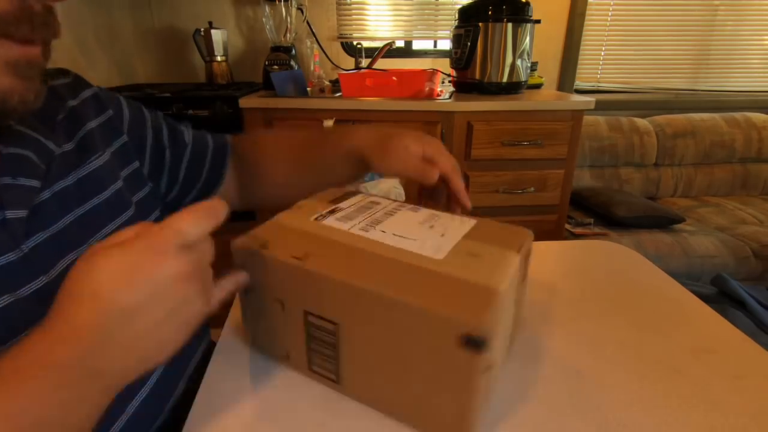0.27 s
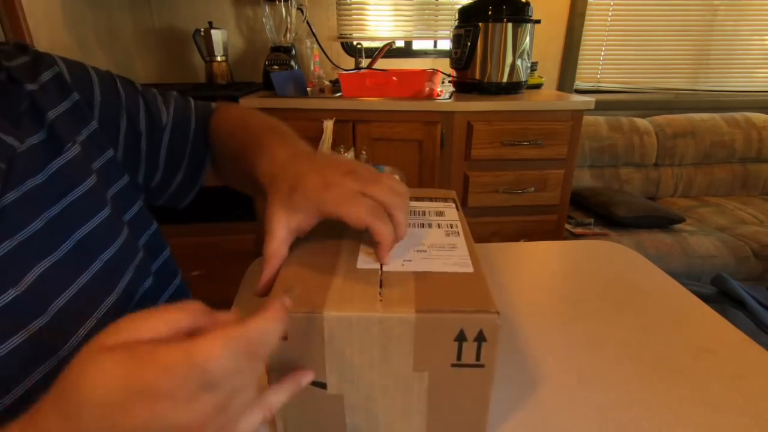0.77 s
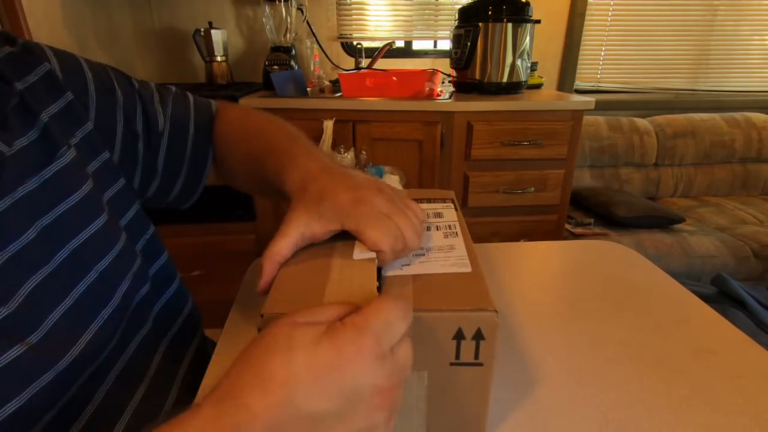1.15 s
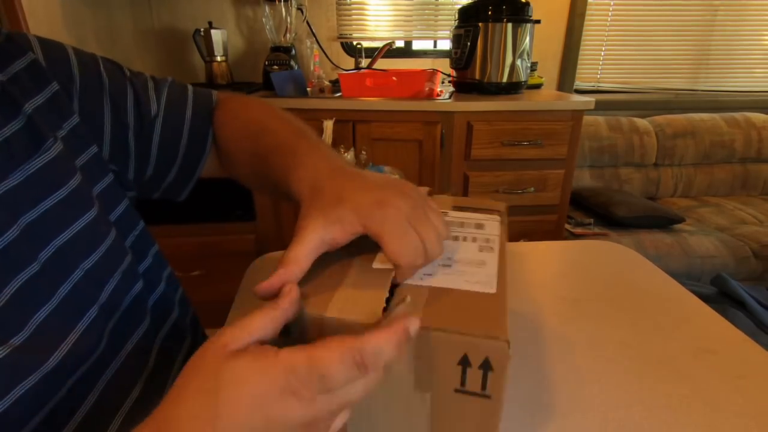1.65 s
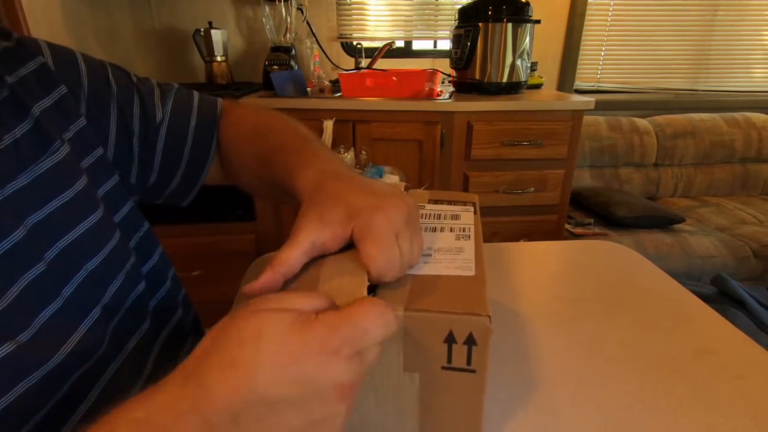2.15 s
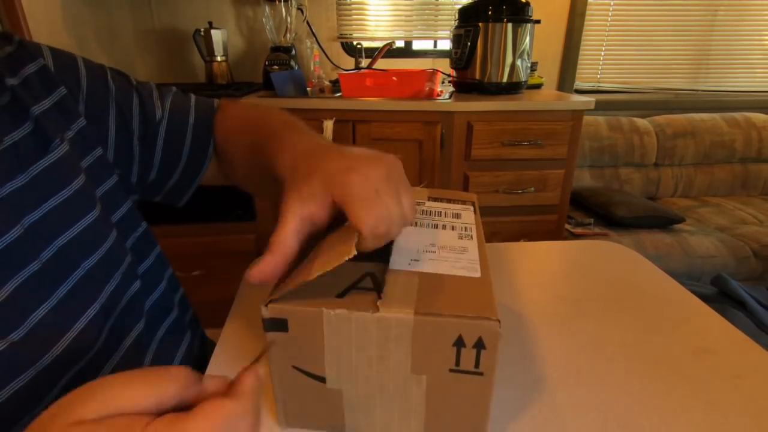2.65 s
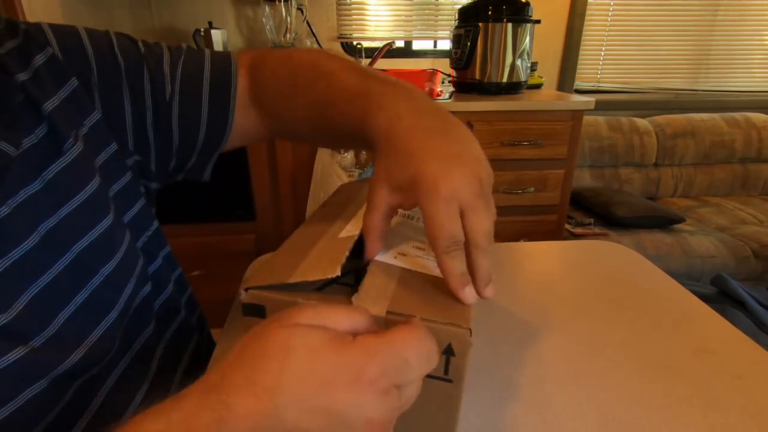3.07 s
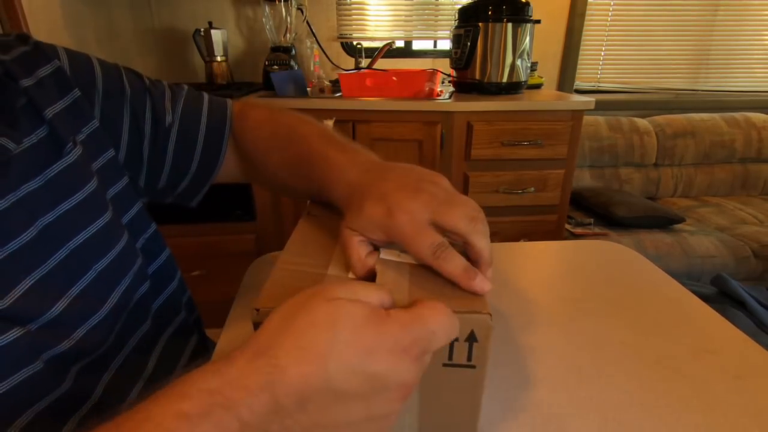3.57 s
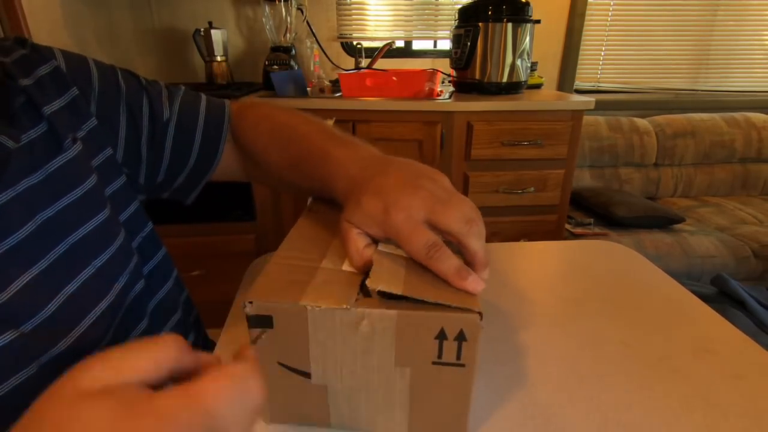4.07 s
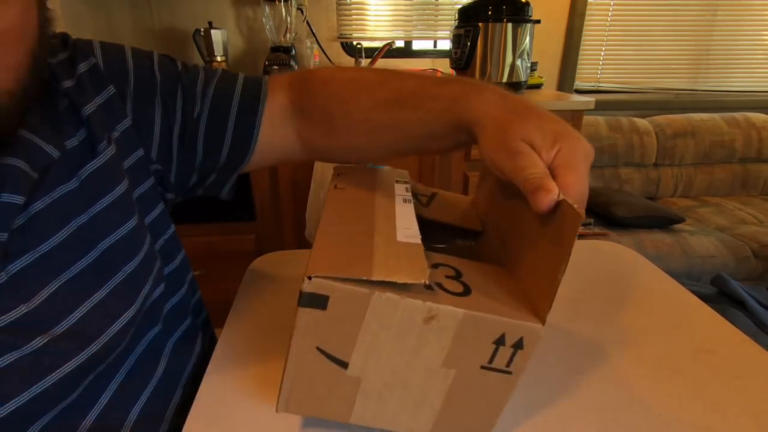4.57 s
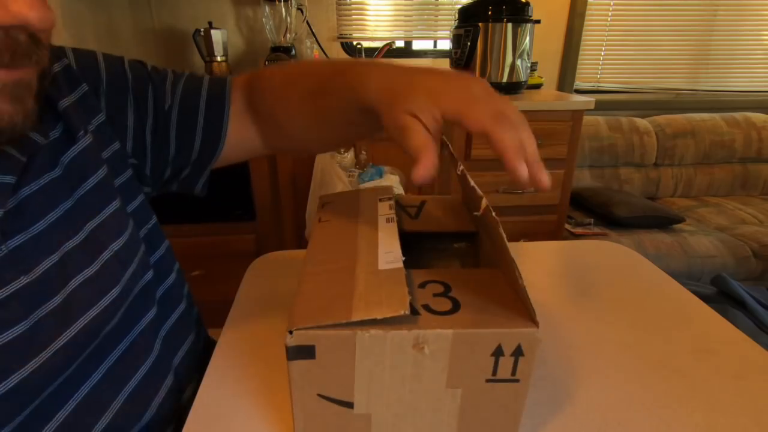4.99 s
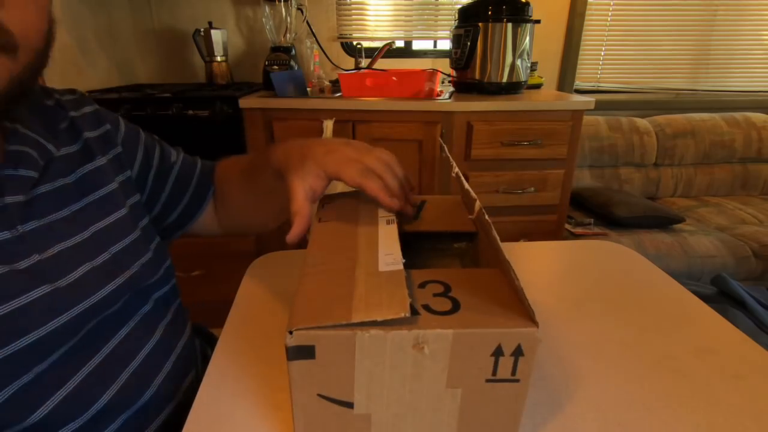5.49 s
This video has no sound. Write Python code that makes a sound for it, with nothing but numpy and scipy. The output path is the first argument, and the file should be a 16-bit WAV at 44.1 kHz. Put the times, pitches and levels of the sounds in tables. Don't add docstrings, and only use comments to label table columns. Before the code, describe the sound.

A close, dry take of hands opening a taped cardboard box on a table in a small quiet room. The first half second holds faint taps, nail scratches and soft skin rubbing. Around 0.9 s a ripping tug sets off a quick cluster of hollow knocks and a low table shudder. Quieter rubbing follows, then a strong hollow thump with a short rip at 1.7 s. After light scuffs, tape tears loudly at about 2.5 s with bright snaps, knocks again at 2.7 s, and cracks hardest near 3.2 s, the box ringing low and boxy. From 3.4 s it calms: papery sliding, a small rip at 3.9 s, a brushing swish at 4.1 s, a dull flap bump with longer scuffing at 4.6 s, faint scratches, and brighter hand rubbing from 5.4 s to the end. Faint room air lies beneath.

```python
import sys
import numpy as np
from scipy import signal
from scipy.fft import rfft, irfft, next_fast_len
from scipy.io import wavfile
from scipy.ndimage import uniform_filter1d, map_coordinates

SR = 44100
rng = np.random.default_rng(int(sys.argv[2]) if len(sys.argv) > 2 else 0)


def volts(x):
    e = np.asarray(x, float) / 20
    return 10 ** e


def wav_out(sig):
    wavfile.write(sys.argv[1], SR, np.round(np.clip(np.atleast_2d(sig).T, -1, 1) * 32767).astype(np.int16))


N = 253134


def unit(x):
    return x / np.sqrt(np.mean(x ** 2) + 1e-20)


def along(points, hz):
    f, v = np.transpose(points)
    return np.interp(np.log(hz + 1), np.log(f + 1), v)


def wobble(rate):
    knots = rng.standard_normal(int(N * rate / SR) + 4)
    return map_coordinates(knots, [np.arange(N) * rate / SR])


def filtered(x, response):
    m = next_fast_len(N + SR // 2)
    return irfft(rfft(x, m) * response(np.fft.rfftfreq(m, 1 / SR)), m)[:N]


def coloured(x, spectrum):
    closed = [(spectrum[0][0] / 2, -120)] + list(spectrum) + [(SR / 2, -120)]
    return unit(filtered(x, lambda hz: volts(along(closed, hz))))


def add(track, s, piece):
    part = track[max(round(s * SR), 0):][:len(piece)]
    part += piece[:len(part)]


def held(rows, rise, fall):
    t = np.arange(0, N, 32) / SR
    start, length, db = (column[:, None] for column in np.transpose(rows))
    too_early = np.maximum(start - t, 0)
    too_late = np.maximum(t - start - length, 0)
    gain = volts(db - rise * too_early - fall * too_late)
    return np.interp(np.arange(N) / SR, t, np.sqrt((gain ** 2).sum(0)))


def slips(rate, spread_db, smooth):
    size = volts(spread_db * np.minimum(rng.exponential(size=N), 2)) * rng.standard_normal(N)
    releases = unit(size * (rng.random(N) < rate / SR))
    return unit(releases + smooth * rng.standard_normal(N))


def patchy(x, patchy_db):
    z = signal.stft(x, nperseg=256)[2]
    field = uniform_filter1d(rng.standard_normal(z.shape), 4, 0)
    field = uniform_filter1d(field, 8, 1)
    return unit(signal.istft(z * volts(patchy_db * unit(field)), nperseg=256)[1][:N])


def box(hz):
    # pitch in Hz, width in Hz, level in dB.
    box_modes = [(154.6, 31.3, -1.5), (240, 46, 2.5), (420, 98.5, -1), (597, 280, -10), (799, 79, -6),
                 (887, 43, -4.5), (1140, 140, -14), (1700, 270, -27)]
    ringing = 0
    for k, (centre, width, db) in enumerate(box_modes):
        mode = 1j * hz * width / (centre * centre - hz * hz + 1j * hz * width)
        ringing = ringing + (-1) ** k * volts(db) * mode
    return ringing / (1 + 1j * hz / 6500) ** 4


def tape_rips():
    # time in seconds, peak in dB, time to fade by 60 dB in seconds,
    # pull on the box in dB relative to the peak.
    rips = [(0.0227, -31, 0.12, 16), (0.569, -43, 0.046, -19), (0.5905, -24, 0.13, -11),
            (0.82, -29.5, 0.091, 12.5), (0.8758, -13.5, 0.2, 7.5), (0.9226, -30, 0.074, 0),
            (1.01, -30, 0.25, 16), (1.372, -39, 0.31, -6), (1.6756, -20, 0.17, -10),
            (1.922, -27, 0.059, -4), (2.4115, -23.5, 0.074, 12), (2.487, -12.5, 0.22, 0),
            (2.552, -7, 0.11, 8), (2.7222, -20, 0.059, -13), (3.1534, -8, 0.16, 8),
            (3.1938, -14.5, 0.067, -7), (3.257, -21.5, 0.13, -8), (3.8706, -24, 0.17, 5)]
    # frequency in Hz, level in dB.
    tear = [(530, -7), (900, -7.5), (1370, -6.5), (2030, -7.5), (2610, -7), (3560, -11.5), (4470, -9.5),
            (6400, -13), (11400, -47.5), (13300, -43), (15700, -63)]
    rise_s, creep_db, creep_s = .003, -21, .014
    crack, crack_s = .6, .004
    rip, tug, t = np.zeros(N), np.zeros(N), np.arange(SR // 3) / SR
    for s, db, t60, pull_db in rips:
        shape = volts(db - 7 - 60 * t / t60) * (1 - np.exp(-t / rise_s))
        creep = volts(db + creep_db) * np.exp((t - .05) / creep_s) * (t < .05)
        add(rip, s - .05, creep)
        add(rip, s - .002, shape * (1 + crack * np.exp(-t / crack_s)))
        add(tug, s - .002, volts(pull_db) * shape)
    glue = patchy(slips(rate=1500, spread_db=3, smooth=0.74), patchy_db=2.5)
    pulling = tug * slips(rate=800, spread_db=3.0, smooth=0.82)
    return echoes(rip * coloured(glue, tear)) + volts(14.5) * filtered(pulling, box)


def glue_snaps():
    # time in seconds, peak in dB, pitch in Hz.
    snaps = [(0.436, -39, 875), (0.821, -32, 1500), (0.592, -26, 4400), (1.159, -27, 864),
             (2.095, -50, 1090), (2.413, -27, 4800), (2.49, -9, 4020), (2.49, -15, 2600),
             (2.503, -20, 4020), (2.553, -4, 4070), (2.726, -7, 620), (2.979, -32, 5870),
             (3.046, -28.5, 890), (3.159, 0, 880), (3.193, -8, 4550), (3.262, -21, 1300),
             (3.275, -23.5, 1000), (3.763, -33, 880), (3.838, -33, 1500), (3.875, -19, 2260),
             (4.96, -33, 700), (5.186, -39, 1700), (5.209, -39.5, 3200), (5.46, -36, 4360)]
    threads, t = np.zeros(N), np.arange(SR // 3) / SR
    for s, db, hz in snaps:
        shape = volts(db + 2 - 60 * t / 0.01) * (1 - np.exp(-t / 0.00035))
        add(threads, s, shape * np.sin(2 * np.pi * hz * t))
    return filtered(threads, lambda hz: 1 / (1 + (hz / 7500) ** 8))


def knocks():
    # time in seconds, peak in dB, panel pitch in Hz, hardness in dB.
    flaps = [(0.027, -29, 782, -3.5), (0.746, -35, 250, 4.5), (0.868, -10.5, 240, -9),
             (0.885, -11.5, 408, 1.5), (0.904, -12, 264, -10), (0.925, -14, 250, -19),
             (0.96, -12.5, 290, 5), (1.011, -22.5, 463, 1), (1.154, -35, 434, 11), (1.37, -23, 237, -8),
             (1.682, -2, 213, -2.5), (1.704, -16.5, 420, -13), (1.924, -25.5, 286, 2),
             (2.095, -33.5, 251, 3.5), (2.411, -22.5, 245, 4), (2.552, -6, 431, -12),
             (2.574, -13.5, 249, 0), (2.7244, -3.5, 300, -3), (2.978, -29.5, 223, -4),
             (3.158, -9.5, 234, 6), (3.185, -5.5, 247, -1.5), (3.467, -28, 400, -3), (3.868, -36, 420, 5),
             (4.63, -14.5, 267, -15)]
    # time in seconds, peak in dB, panel pitch in Hz.
    more_knocks = [(0.12, -28.5, 153), (0.16, -24.5, 245), (0.431, -34.5, 254), (0.485, -29.5, 253),
                   (0.589, -24.5, 370), (0.818, -20.5, 150), (1.398, -26, 154), (1.446, -20, 240),
                   (2.272, -25.5, 369), (2.844, -30.5, 174), (3.045, -33, 152), (3.257, -22.5, 460),
                   (3.312, -28.5, 252), (3.76, -34, 272), (4.959, -40, 282), (5.307, -39.5, 331)]
    shared_hard_db = -6.5
    ring_s, ring_s_per_db = .036, -.0006
    panel, push, t = np.zeros(N), np.zeros(N), np.arange(SR // 5) / SR
    for s, db, hz, hard_db in list(flaps) + [(*row, shared_hard_db) for row in more_knocks]:
        t60 = ring_s + ring_s_per_db * db
        bend = np.sin(2 * np.pi * hz * t) * volts(-60 * t / t60) * (1 - np.exp(-t / 0.0014))
        clatter = volts(hard_db - 60 * t / 0.035) * rng.standard_normal(len(t))
        thump = np.exp(-(t * hz * 4 - 1.5) ** 2)
        add(panel, s, volts(db + 1.5) * bend)
        add(push, s, volts(db + 17.0) * clatter + volts(db + 3.0) * thump)
    return panel + filtered(push, box)


def rubbing():
    # start in seconds, length in seconds, hiss level in dB,
    # palm level in dB relative to the hiss.
    strokes = [(0.132, 0.22, -61.5, 9), (0.483, 0.089, -57, 0), (0.736, 0.19, -51, 1),
               (0.881, 0.14, -46, -10), (1.002, .2, -54, 2), (1.217, 0.37, -58, 2.5),
               (1.716, .23, -52.5, 0), (2.025, 0.08, -61.5, 4.5), (2.183, 0.15, -59, 5),
               (2.457, .12, -50.5, 3.5), (2.573, 0.088, -40.5, -9), (2.733, 0.028, -52.5, 0),
               (2.814, 0.035, -49.5, -5), (2.896, 0.031, -51.5, -4.5), (2.982, 0.03, -51.5, -1),
               (3.059, 0.034, -52, 1), (3.198, 0.13, -45, -7.5), (3.393, 0.3, -48, -3.5),
               (3.729, 0.22, -56, 1.5), (4.123, 0.16, -42.5, -5.5), (4.367, 0.084, -55.5, -12),
               (4.522, 0.092, -58.5, -4.5), (4.652, .39, -41, -6), (4.8, .14, -40, -3), (5.19, 0.2, -69, 3),
               (5.422, 0.26, -46, -4.5), (5.54, .06, -34, -13), (5.62, .15, -38, -9)]
    # frequency in Hz, level in dB.
    hiss_tone = [(1800, -48.5), (2600, -27), (3300, -11), (4300, -0.5), (5800, 2.5), (7000, -5.5),
                 (9000, -24.5), (10500, -64)]
    palm_tone = [(700, -9.5), (1000, -23.5), (1600, -7.5), (1900, -6.5), (2400, -7.5), (3000, -9.5),
                 (4000, -14.5)]
    edge_tone = [(8500, -10), (10000, -1.5), (11500, -9.5), (13300, -3.5), (15000, -11.5), (15800, -28)]
    rise, fall = 420, 320
    hiss = held([(s, n, db) for s, n, db, _ in strokes], rise, fall)
    palm = held([(s, n, db + rel) for s, n, db, rel in strokes], rise, fall)
    edge = volts(-16) * hiss ** 1.277
    fibres = patchy(slips(rate=4800, spread_db=2.5, smooth=1.3), patchy_db=2.0)
    fibres = fibres * volts(.8 * wobble(30))
    rub = hiss * coloured(fibres, hiss_tone)
    rub += edge * coloured(fibres, edge_tone)
    return rub + palm * coloured(fibres, palm_tone)


def nails():
    # start in seconds, level in dB, length in seconds, brightest pitch in Hz.
    scratches = [(0.096, -44.5, 0.28, 5530), (.74, -50, 0.035, 4970), (2.022, -54.5, 0.046, 5360),
                 (2.182, -60, 0.061, 4600), (2.274, -56, 0.081, 5500), (2.738, -48, 0.042, 5970),
                 (2.813, -46.5, 0.049, 5800), (2.893, -50.5, 0.054, 5700), (2.982, -46, 0.038, 5800),
                 (3.05, -52, 0.059, 4540), (4.348, -51.5, 0.11, 5030), (4.377, -62.5, 0.1, 2500),
                 (4.521, -53.5, 0.045, 3360), (5.10, -56.5, 0.018, 5500), (5.247, -56, 0.11, 2830),
                 (5.296, -53, 0.045, 5600)]
    out = np.zeros(N)
    for s, db, length, hz in scratches:
        count = round(length * SR)
        band = signal.butter(2, [hz * 0.83, hz * 1.11], "bandpass", fs=SR, output="sos")
        scratch = unit(signal.sosfilt(band, rng.standard_normal(SR // 3))[:count])
        add(out, s, volts(db) * np.hanning(count) ** 0.59 * scratch)
    return out


def grip_changes():
    # start in seconds, length in seconds, rumble level in dB,
    # drag on the small panels in dB relative to the rumble.
    grips = [(0.01, 0.16, -39, -14.5), (0.247, 0.12, -44, -10.5), (0.438, 0.13, -46.5, -20),
             (0.574, 0.028, -46, 4), (0.668, .16, -50, -10), (0.87, 0.11, -36, -14), (0.983, 0.18, -42, 2),
             (1.23, 0.076, -47, -9), (1.362, 0.11, -40, -18), (1.503, 0.15, -53.5, -11),
             (1.681, 0.053, -29.5, -12), (1.765, .2, -40, -15), (2.02, 0.15, -49.5, -18),
             (2.177, 0.11, -44.5, -0.5), (2.406, 0.028, -38, -2.5), (2.503, 0.086, -40, -15),
             (2.633, .5, -52.5, -3), (3.157, 0.17, -43, -4.5), (3.448, .06, -38.5, -10),
             (3.546, 0.17, -49, -15), (3.77, .14, -40.5, -11), (3.95, 0.18, -59, -11),
             (4.167, 0.13, -45, -15.5), (4.338, 0.23, -60.5, -12), (4.63, 0.39, -49, -4.5),
             (4.909, 0.14, -45.5, -5.5), (5.043, 0.36, -58, -15), (5.372, 0.36, -42.5, -12)]
    rise, fall = 420, 336
    rumble = held([(s, n, db) for s, n, db, _ in grips], rise, fall)
    slide = held([(s, n, db + rel) for s, n, db, rel in grips], rise, fall)

    def soft(hz):
        return box(hz) / (1 + 1j * hz / 500) ** 2

    def small(hz):
        ring = .18j * hz * 200 / (920 ** 2 - hz * hz + 200j * hz)
        return (box(hz) + ring) * (hz / (hz + 600)) ** 3 / (1 + (hz / 1010) ** 12)

    jolts = volts(2.5 * wobble(25)) * slips(rate=140, spread_db=2, smooth=1.1)
    drag = slips(rate=700, spread_db=3.0, smooth=0.53)
    return rumble * unit(filtered(jolts, soft)) + slide * unit(filtered(drag, small))


def table_sway():
    # start in seconds, length in seconds, sway level in dB.
    leans = [(.08, 0.07, -44), (.35, .4, -48), (.87, 0.12, -26.5), (1.05, 0.23, -37.5), (1.46, 0.13, -44.5),
             (1.68, .05, -31.5), (1.82, .2, -39), (2.15, .35, -45.5), (2.56, 0.087, -34), (2.8, 0.036, -35),
             (2.92, 0.18, -46), (3.17, 0.19, -36), (3.45, 0.17, -50.5), (3.86, 0.092, -40),
             (4.2, 0.27, -39), (4.63, 0.14, -37), (4.92, 0.11, -37.5), (5.05, 0.17, -46),
             (5.35, 0.28, -32.5), (5.66, .1, -44)]
    rise, fall = 460, 190
    swing = 2 * np.pi * np.cumsum(27 + 2.5 * wobble(5)) / SR
    shudder_tone = [(18, -9), (35, 3.0), (60, -3.0), (110, -11.0), (140, -28.5)]  # (Hz, dB)
    shudder = coloured(rng.standard_normal(N), shudder_tone)
    sway = unit(volts(2.9 * wobble(10.0)) * np.sin(swing) + 0.44 * shudder)
    return held(leans, rise, fall) * sway


def echoes(x):
    echo_db, echo_s = -17, .014
    copies = np.zeros(SR // 20)
    delays = (rng.random(8) * echo_s * SR).astype(int) + 30
    copies[delays] = volts(echo_db) * rng.choice([-1, 1], size=8)
    copies[0] = 1
    return signal.fftconvolve(x, copies / np.linalg.norm(copies))[:N]


def room(x):
    # frequency in Hz, time to fade by 60 dB in seconds.
    fading = [(200, 0.18), (2000, 0.087), (10000, 0.29)]
    hz, t, z = signal.stft(rng.standard_normal(SR // 2), SR, nperseg=256)
    tail = signal.istft(z * volts(-60 * t / along(fading, hz)[:, None]), SR, nperseg=256)[1]
    late = np.pad(x, (300, 0))
    return signal.fftconvolve(late, tail / np.linalg.norm(tail))[:N]


def room_air():
    # frequency in Hz, level in dB.
    air_tone = [(60, -17.5), (100, -19), (160, 5.5), (250, -6), (550, -23.5), (800, -15), (1150, -23.5),
                (3000, -24), (5800, -25.5), (9000, -40), (12000, -59)]
    return volts(-46.5 - 7.5) * coloured(rng.standard_normal(N), air_tone)


def scene():
    hits = knocks() + tape_rips() + glue_snaps()
    hands = echoes(rubbing() + nails()) + grip_changes() + table_sway()
    mix = hits + volts(-10.0) * room(hits) + hands + room_air()
    return mix[None]


def band_limit(x):
    return signal.sosfilt(signal.butter(12, 15830, fs=SR, output="sos"), x)


def record(dry):
    rounded = dry / (1 + np.abs(dry) ** 6) ** (1 / 6)
    return band_limit(rounded)


dry = scene()
out = record(dry)
wav_out(out)
```